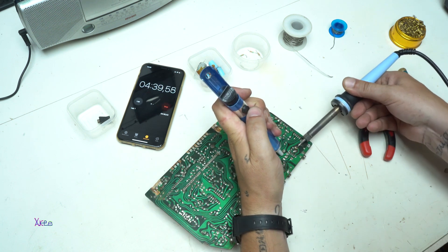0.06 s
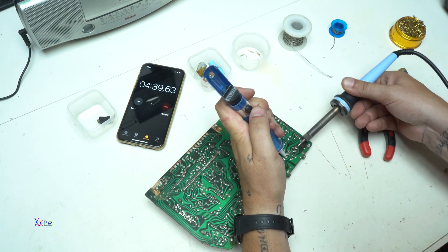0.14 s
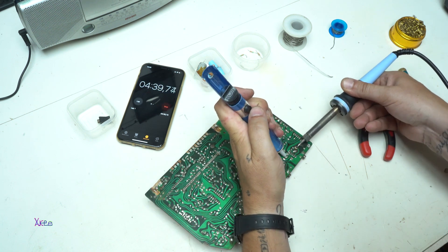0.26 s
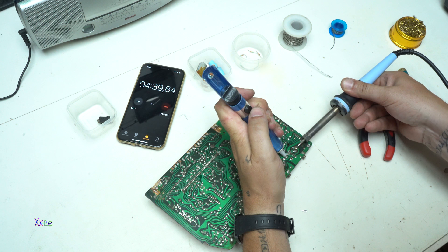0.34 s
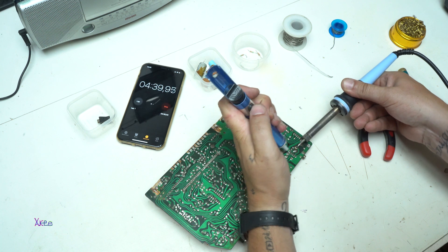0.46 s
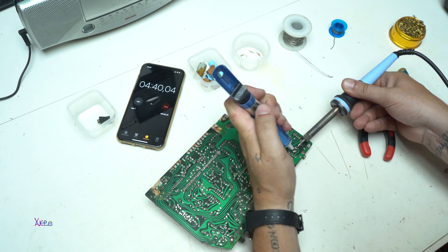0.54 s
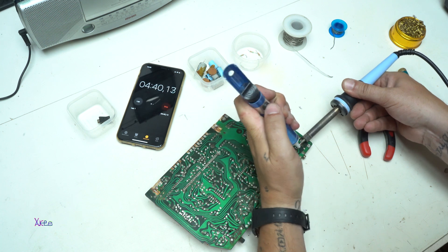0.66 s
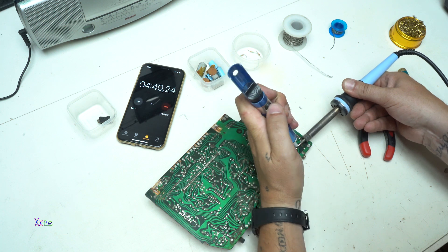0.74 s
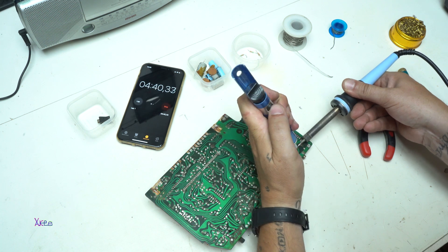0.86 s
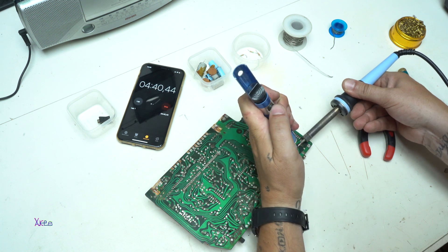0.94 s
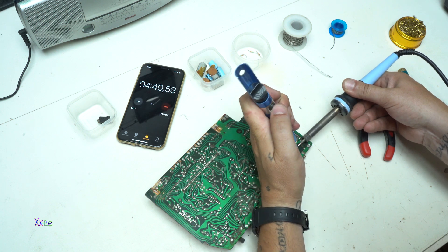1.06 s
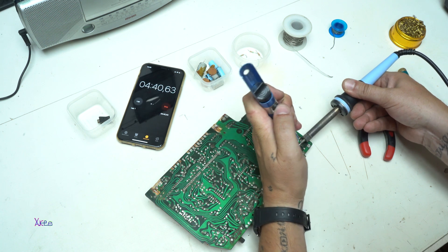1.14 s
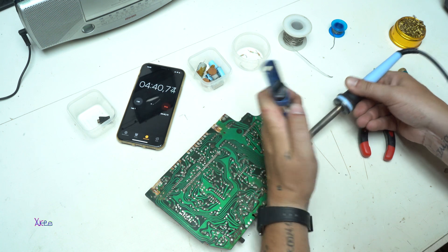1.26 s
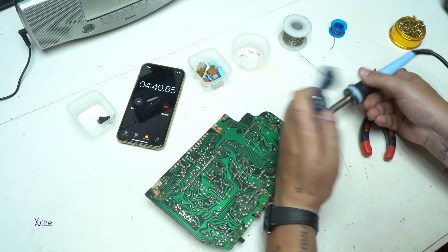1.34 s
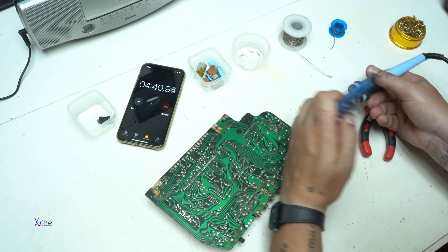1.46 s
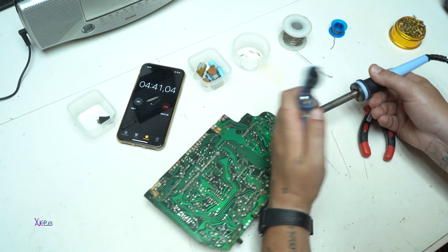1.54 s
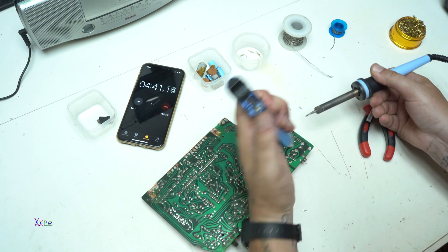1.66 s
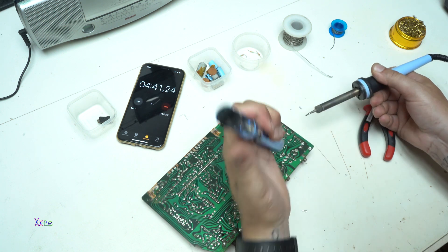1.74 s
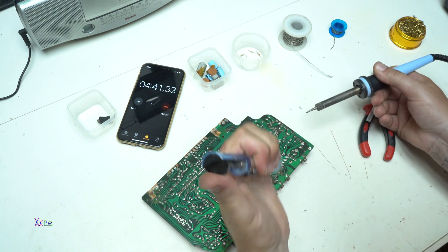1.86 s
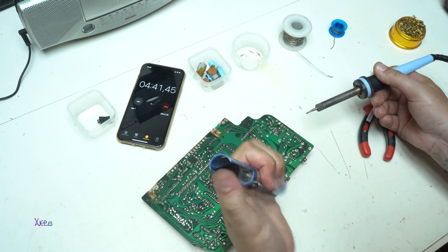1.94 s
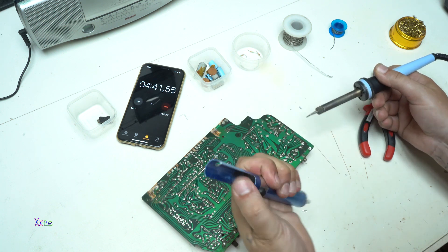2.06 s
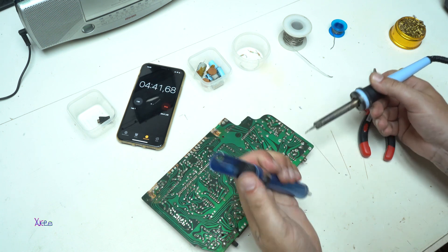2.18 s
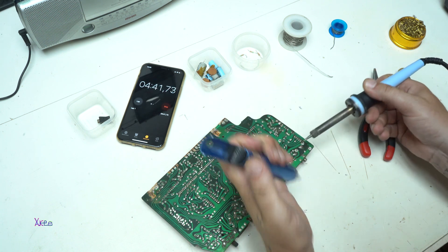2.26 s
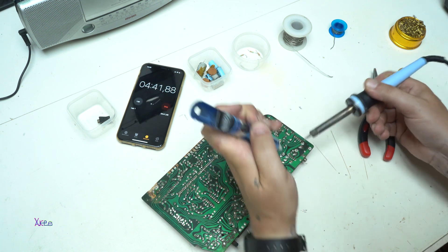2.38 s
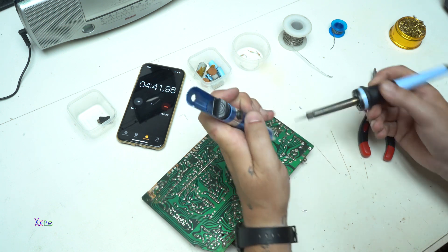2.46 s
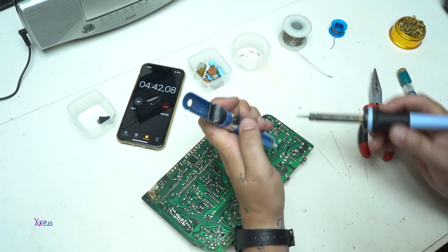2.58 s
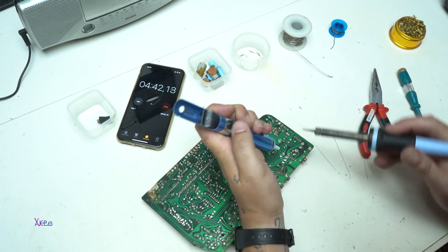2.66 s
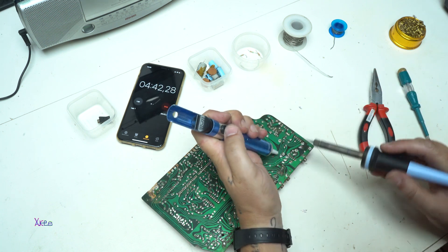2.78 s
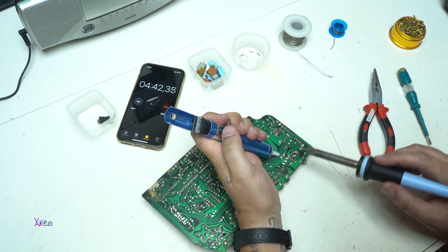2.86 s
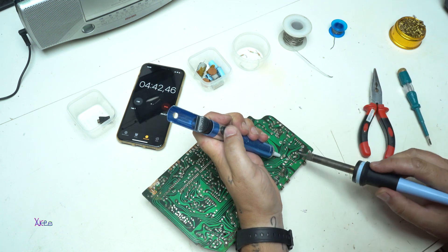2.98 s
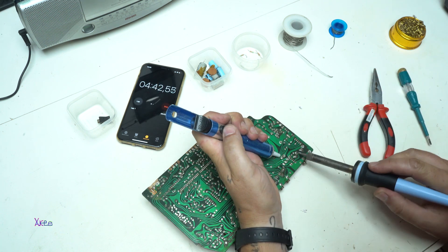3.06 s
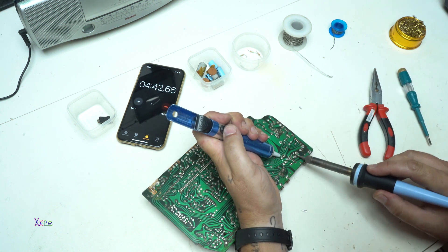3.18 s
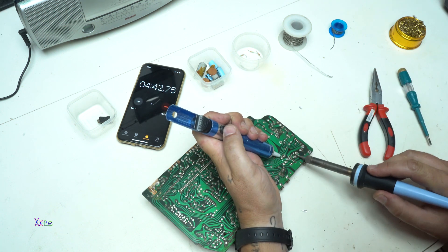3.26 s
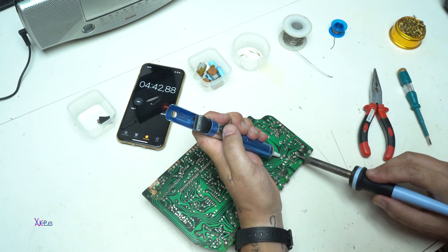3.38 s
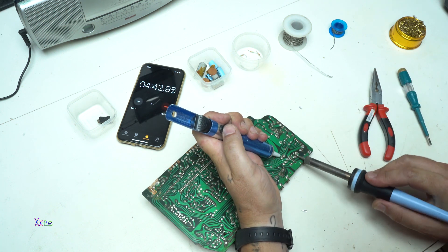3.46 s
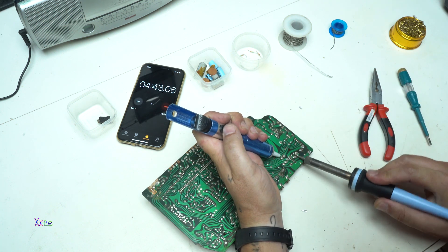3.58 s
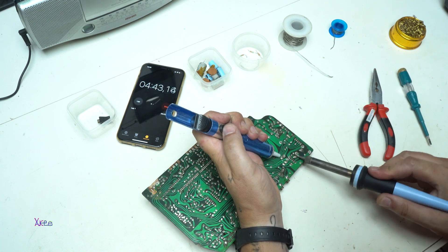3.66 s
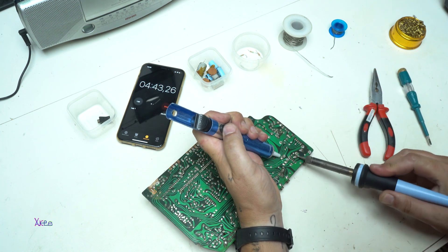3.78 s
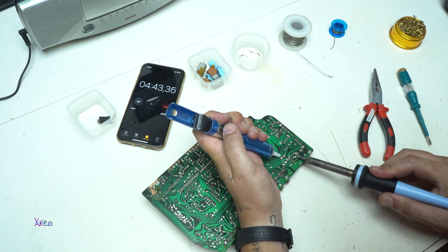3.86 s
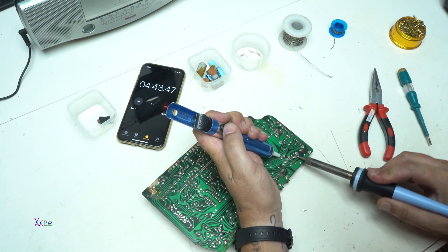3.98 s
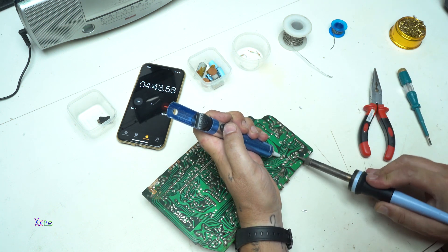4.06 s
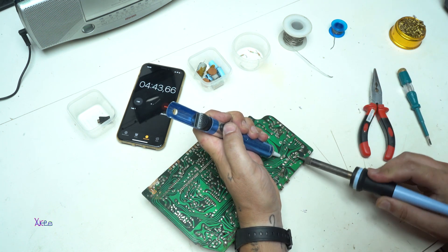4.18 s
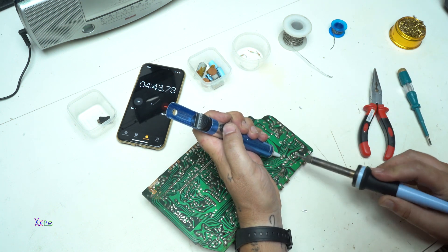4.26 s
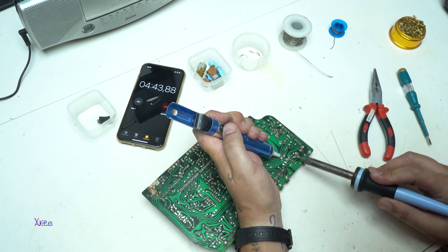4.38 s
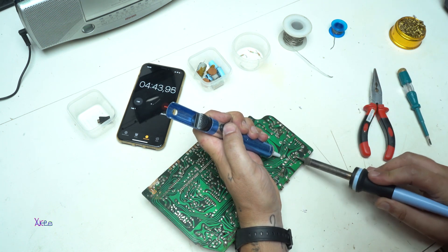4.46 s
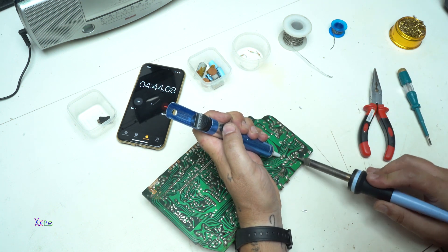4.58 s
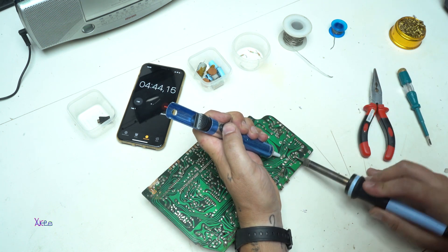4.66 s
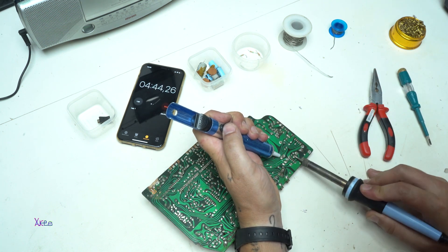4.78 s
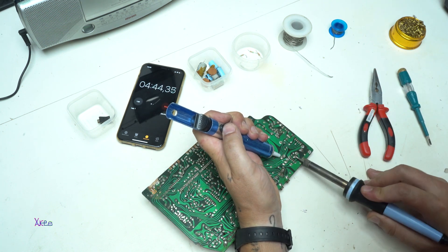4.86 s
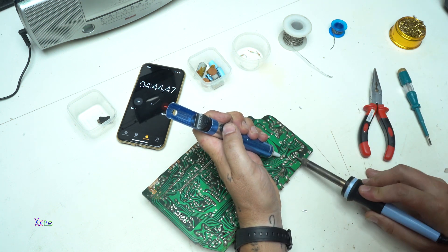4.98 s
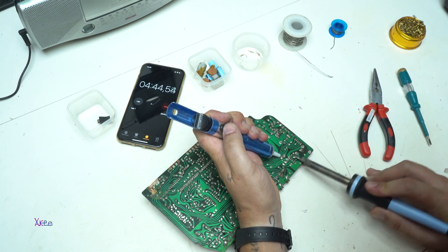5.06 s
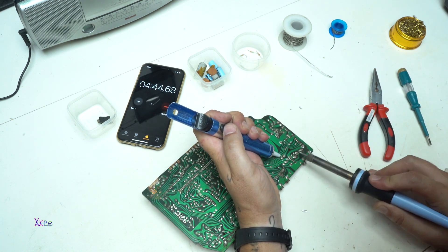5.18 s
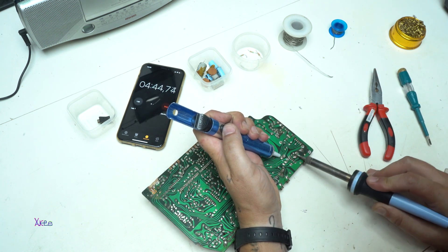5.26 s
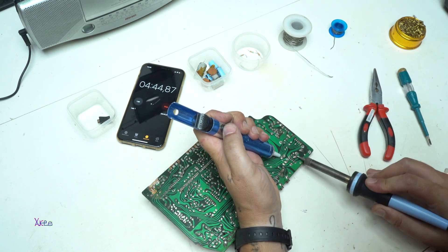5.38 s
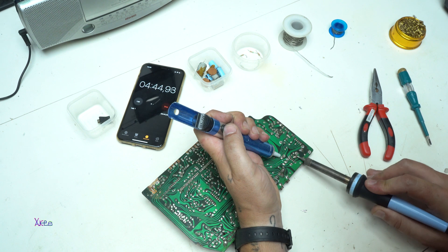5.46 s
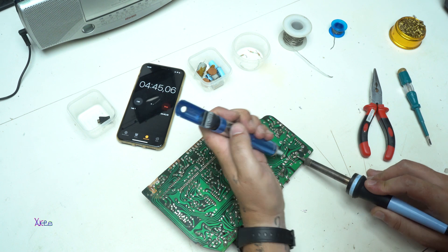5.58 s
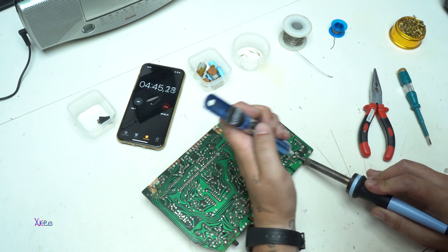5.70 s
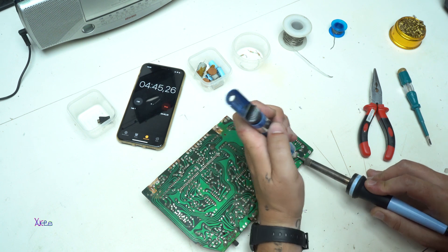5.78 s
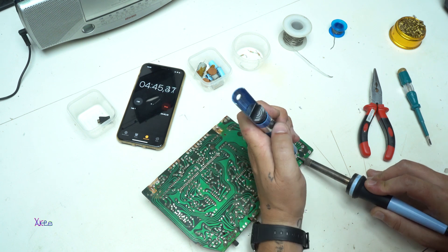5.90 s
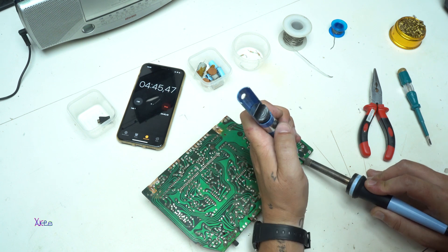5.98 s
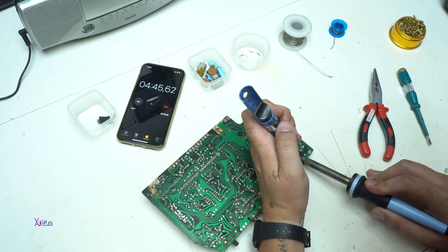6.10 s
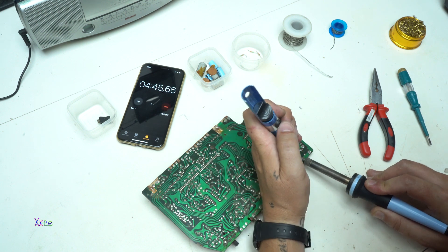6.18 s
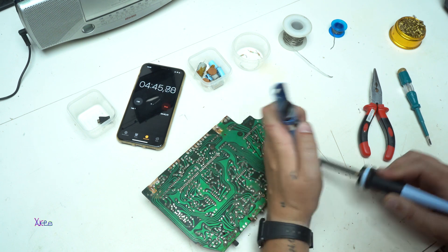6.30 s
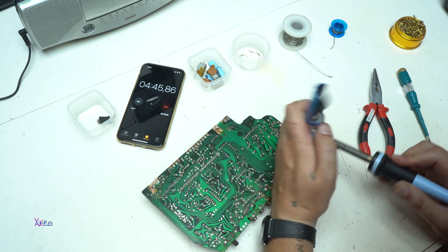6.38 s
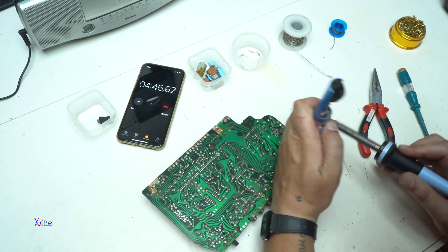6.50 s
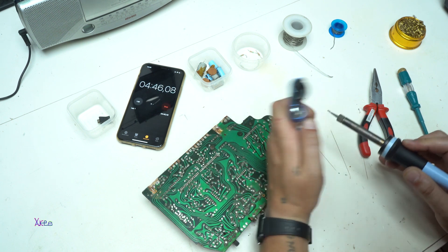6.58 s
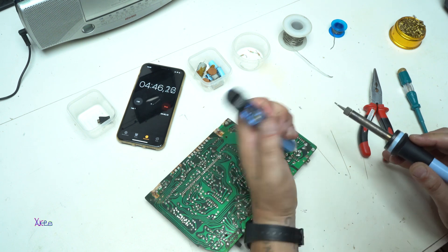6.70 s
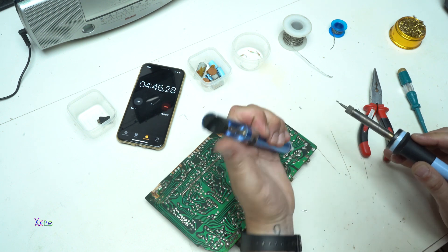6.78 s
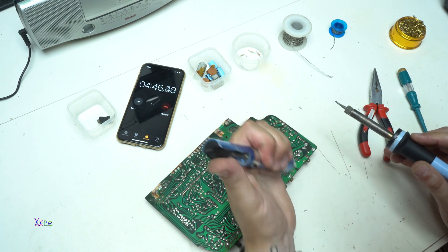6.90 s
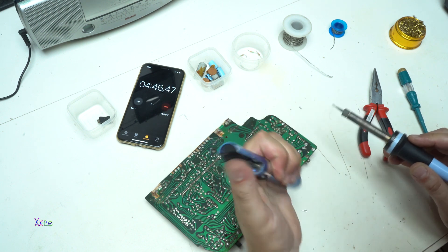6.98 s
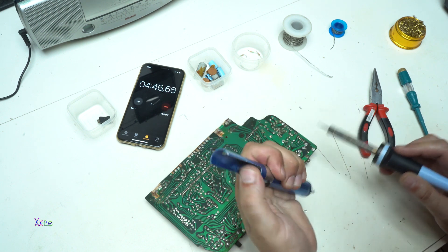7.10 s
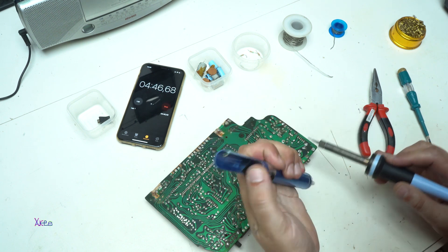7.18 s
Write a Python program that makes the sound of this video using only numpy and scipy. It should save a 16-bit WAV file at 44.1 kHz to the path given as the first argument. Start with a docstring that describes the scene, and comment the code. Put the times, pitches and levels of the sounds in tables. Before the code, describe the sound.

A steady, low hush fills a small, briefly echoing room, heard close to the bench. Faint gritty iron scrapes come at 0.1-0.5 s, with two dull bumps at 0.5. Around 1.35 a short nozzle squeak leads into a loud double-edged pump snap at 1.4, its spring ringing. Two hard woody knocks fall at 1.68 and 1.73, with weaker bounces by 1.83. The plunger slides from 2.0; a bright catch clicks at 2.13 and a lever clacks at 2.25. A hand brushes softly from 2.5, amid tiny pings and bumps. A firm tap lands at 3.2, a faint tick at 3.8, light taps at 4.3-4.6, a tiny squeak at 4.83, scrapes around 5 and a sharp tap at 5.37. After faint contacts, the pump snaps at 6.46, knocks at 6.73 and 6.78, and slides to a click at 7.18. The loudest peaks flatten slightly.

```python
"""At a bench in a small room, an iron scrapes and bumps a circuit board, a nozzle squeaks on it, and a desoldering
pump fires with a snap. The pump is knocked out on the bench and cocked again with a slide and clicks. A hand
slides on the bench, nozzle and iron tick, scrape and squeak, then the pump fires, knocks and clicks once more.
Blows are noise bursts and thumps that ring tuned modes, rubbing is grains on hiss, squeaks are gliding tones.
A steady hush lies under it all, the room echoes, and the loudest blows overload the microphone."""
import sys
import numpy as np
from scipy import signal
from scipy.fft import rfft, irfft
from scipy.io import wavfile
from scipy.ndimage import uniform_filter1d

SR = 44100
rng = np.random.default_rng(int(sys.argv[2]) if len(sys.argv) > 2 else 0)


def log_audio(samples):
    """Write samples as a 16-bit WAV file to the path given in sys.argv[1]."""
    # one column per channel
    frames = np.atleast_2d(samples).T
    # limit to full scale, then quantise
    limited = np.clip(frames, -1, 1)
    pcm = np.round(limited * 32767).astype(np.int16)
    wavfile.write(sys.argv[1], SR, pcm)


N = 319284  # samples, about 7.24 s


def amp(db):
    """Decibels to gain."""
    return 10 ** (np.asarray(db) / 20)


def unit(x):
    """Bring x to rms 1."""
    return x / np.sqrt(np.mean(x ** 2) + 1e-20)


def along(points, hz):
    """Read a curve of (Hz, value) points on a log frequency axis."""
    point_hz, value = np.transpose(points)
    return np.interp(np.log(hz + 1), np.log(point_hz + 1), value)


def add(track, s, sound):
    """Mix a sound into the track at time s, in place."""
    part = track[max(round(s * SR), 0):][:len(sound)]
    part += sound[:len(part)]


def coloured(x, colour, tilt=0, size=4096):
    """Minimum-phase filter with the given spectrum, tilted above 700 Hz in dB per octave."""
    hz = np.fft.rfftfreq(size, 1 / SR)
    spectrum_db = along(colour, hz) + tilt * np.log2(np.maximum(hz / 700, 1))
    cepstrum = irfft(np.log(amp(spectrum_db)))
    # folding the cepstrum onto positive time makes the filter causal
    fold = 1 + np.sign(size // 2 - np.arange(size))
    fold[0] = 1
    response = irfft(np.exp(rfft(cepstrum * fold)))[:size // 2]
    return signal.fftconvolve(x, response)[:len(x)]


def bouncing(rows, lag, loss_db):
    """Each contact is followed by a weaker one, lag s later."""
    return rows + [(s + lag, db - loss_db, tilt) for s, db, tilt in rows]


def blows(rows, colour, chatter, lead, t60, modes, ring_db):
    """The contact chatters as it closes, pushes home after lead s and settles in t60 s; the body's modes ring on."""
    track = np.zeros(N)
    t = np.arange(SR // 4) / SR
    after = np.maximum(t - lead, 0)
    closing = np.minimum(t / lead, 1) ** 2
    for s, db, tilt in rows:
        force = rng.standard_normal(len(t)) * closing * amp(-60 * after / t60)
        force *= chatter / np.linalg.norm(force)
        force -= uniform_filter1d(force, size=64, mode="constant")  # the chatter carries no bass
        add(force, lead, np.ones(1))  # the sharp part of the push
        add(force, lead, chatter * signal.windows.hann(64) / 32)  # its soft part gives the thump
        body = coloured(force, colour, tilt)
        body /= np.sqrt(np.sum(body ** 2) / (SR // 250))  # equal energy, as if rms 1 for 4 ms
        ring = np.zeros(len(t))
        for hz, level, life in modes:
            # every blow excites the modes a little differently
            fade = amp(level + rng.normal(0, 2) - 60 * after / life)
            ring += fade * np.sin(2 * np.pi * hz * rng.normal(1, .002) * after)
        add(track, s, amp(db) * (body + amp(ring_db) * ring))
    return track


def rubbing(rows, colour, rate, grain_db, attack, sag_db, release_t60, hiss=.5, judder_db=1.0):
    """Friction as tiny uneven slips, rate a second, on a fine hiss; each stroke rises, sags over its length and dies."""
    track = np.zeros(N)
    t = np.arange(SR // 2) / SR
    for s, length, db, tilt in rows:
        sign, size, judder, fine = rng.standard_normal((4, len(t)))
        slips = (rng.random(len(t)) < rate / SR) * sign * amp(grain_db * size)
        pressure = amp(judder_db * unit(uniform_filter1d(judder, size=300)))
        friction = unit(coloured(pressure * (unit(slips) + hiss * fine), colour, tilt))
        stroke = np.minimum(t / attack, 1) * amp(-sag_db * np.minimum(t / length, 1))
        release = amp(-60 * np.maximum(t - length, 0) / release_t60)
        add(track, s, amp(db) * stroke * release * friction)
    return track


# The pump fires. Each row: start in seconds, piston flight in seconds, release level in dB,
# flight level in dB, stop level in dB.
SHOTS = [(1.391, .0306, -1.5, -14, -9), (6.461, .027, -2.5, -19.5, -6.5)]
# Colour of the snap and the flight. Each row: frequency in Hz, level in dB.
SNAP_COLOUR = [(40, -26), (75, -7.5), (110, -3.5), (160, -16.5), (400, -14.5), (750, -16), (1800, -10),
               (3200, -8), (4800, -2), (5700, 0.5), (8000, -12), (11000, -8), (15500, -19.5)]
# Ringing of the pump's spring, also heard under its ticks. Each row: frequency in Hz, level in dB, t60 in seconds.
SPRING = [(3634, -12.5, .16), (4560, 5, 0.15), (4856, -2.5, .16), (5100, 0.5, 0.22), (7000, -9.5, .15),
          (10400, -10.5, .2)]
# The bench top under a shot or a knock. Each row: frequency in Hz, level in dB, t60 in seconds.
BENCH = [(104, -1, .42), (140, -5, .35), (210, -4, .22), (390, 3, .3), (597, 0, .24), (649, 1, .25),
         (709, 1.5, .24), (803, 0, .25), (1302, 6, .15), (1429, 7, .16), (1632, 4, .15), (1731, 3, .15),
         (1916, 3, .17)]
BENCH_BY_SHOT_DB = -15  # the recoil rings the bench top: offset on its mode levels


def firing(release_tilt=-1.3, stop_tilt=4):
    """The trigger lets go, the piston rattles up the barrel and hits its stop; the spring and the bench top ring."""
    releases = [(s, db, release_tilt) for s, _, db, _, _ in SHOTS]
    flights = [(s, flight, db, 0) for s, flight, _, db, _ in SHOTS]
    stops = [(s + flight, db, stop_tilt) for s, flight, _, _, db in SHOTS]
    contacts = bouncing(releases, lag=0.0043, loss_db=4) + stops
    modes = SPRING + [(hz, db + BENCH_BY_SHOT_DB, t60) for hz, db, t60 in BENCH]
    snaps = amp(-5.0) * blows(contacts, SNAP_COLOUR, chatter=5, lead=0.00099, t60=.017,
                              modes=modes, ring_db=-24.5)
    rattle = rubbing(flights, SNAP_COLOUR, rate=9900, grain_db=1.0, attack=0.0039, sag_db=2.5, release_t60=.015)
    return snaps + rattle


# The pump knocked on the bench. Each row: start in seconds, level in dB, brightness in dB per octave.
KNOCKS = [(1.6799, 6.5, -2.5), (1.731, 6, -1), (1.802, -4, -3), (1.8293, -9.5, -2), (6.729, 7, -3.5),
          (6.778, 4, -2.5), (6.837, -6.5, -1.5)]
# Colour of the knocks. Each row: frequency in Hz, level in dB.
KNOCK_COLOUR = [(40, -33), (110, -20), (300, -16), (700, -10), (1020, -11), (1380, .5), (1900, -5.5),
                (2400, -13), (3500, -14.5), (4900, -17), (7000, -28), (15500, -43)]
# the loose piston answers a knock: delay in s, level in dB, dB per dB of the knock, brightness in dB per octave
RATTLE_LAG_S, RATTLE_DB, RATTLE_GROWS, RATTLE_TILT = 0.0044, -19.5, 2.1, 6


def knocking():
    """Knocks boom in the bench top, and harder ones rattle the loose piston disproportionately more."""
    rattles = [(s + RATTLE_LAG_S, RATTLE_DB + RATTLE_GROWS * db, RATTLE_TILT) for s, db, _ in KNOCKS]
    return amp(-11.5) * blows(KNOCKS + rattles, KNOCK_COLOUR, chatter=6.3, lead=0.0032, t60=.017,
                              modes=BENCH, ring_db=-33.5)


# Pushes of the plunger. Each row: start in seconds, length in seconds, level in dB, brightness in dB per octave.
PLUNGER = [(2.003, 0.048, -38.5, 0), (2.066, 0.06, -38, -0.5), (6.95, 0.055, -46, -3.5),
           (7.067, 0.11, -38, -1.5)]
# Colour of the sliding plunger. Each row: frequency in Hz, level in dB.
PLUNGER_COLOUR = [(180, -37.5), (300, -13.5), (696, -16.5), (1490, -18.5), (1810, -20), (2210, -2.5),
                  (2740, -12), (3450, -1.5), (4420, -2.5), (5660, -3), (8840, -17.5), (11500, -13),
                  (15500, -26.5)]
# Clicks of the pump being cocked: lead ticks, the catch, and the clack of the returning lever.
# Each row: start in seconds, level in dB, brightness in dB per octave.
COCKING_CLICKS = [(2.1112, -11, -1), (2.1303, 18, 1), (2.248, -5, 1), (2.2535, 6.5, -2.5), (2.2587, 3, 7.5),
                  (7.1123, -11.5, -5), (7.1608, -13, -1), (7.1823, 16, 0)]
# Colour of these clicks. Each row: frequency in Hz, level in dB.
CLICK_COLOUR = [(50, -36.5), (250, -23), (800, -23), (1600, -19), (2300, -1.5), (2750, -8.5), (3250, 1.5),
                (4300, -5), (5200, -5), (7200, -10), (9000, -19.5), (11800, -16.5), (15500, -32)]
# Ringing of barrel and catch. Each row: frequency in Hz, level in dB, t60 in seconds.
BARREL = [(1870, -9.5, 0.14), (2223, -4.5, .22), (2390, -3, .26), (3080, -2.5, .32), (3160, -1, .25),
          (3295, -1.5, .17), (4000, -2.5, .3), (4210, -4.5, 0.17), (4720, -6, .22), (4830, -3, 0.22),
          (5585, -2.5, 0.19), (7000, -4.5, .3)]


def cocking():
    """The plunger slides down against the spring; lead ticks, catch and returning lever click and ring the barrel."""
    slide = rubbing(PLUNGER, PLUNGER_COLOUR, rate=5000, grain_db=2.0, attack=.016, sag_db=2.0, release_t60=.06)
    clicks = amp(-18.5) * blows(COCKING_CLICKS, CLICK_COLOUR, chatter=5, lead=0.0013, t60=0.021,
                                modes=BARREL, ring_db=-27)
    return slide + clicks


# Nozzle and iron strike the board. Each row: start in seconds, level in dB, brightness in dB per octave.
TAPS = [(3.203, -5.5, -1.5), (3.273, -27, -7), (4.322, -20, -1.5), (4.547, -14, 2.5), (4.571, -22, .5),
        (5.372, -2.5, 1.5), (6.11, -40, -6.5), (6.339, -34.5, -3)]
# Colour of the taps. Each row: frequency in Hz, level in dB.
TAP_COLOUR = [(50, -22.5), (130, -25), (250, -12), (400, -21.5), (600, -9.5), (850, -22), (1150, -2.5),
              (1350, 1), (1900, -11.5), (2300, -18), (3000, -11), (3900, -17), (5250, -2.5), (6200, -9.5),
              (7500, -11.5), (8800, -25), (15500, -37)]
# Ringing of the iron's steel shaft, also under its pings. Each row: frequency in Hz, level in dB, t60 in seconds.
IRON = [(5440, -2, 0.307), (5300, -2, .26), (5900, -10.5, .15), (6000, -9, 0.2), (10900, -9, 0.29)]
# The board's flexing, also under the bumps. Each row: frequency in Hz, level in dB, t60 in seconds.
PANEL = [(230, -10.5, 0.11), (262, 2.5, 0.21), (598, -5.5, 0.15), (1262, 5, .05), (1910, -5.5, .12)]


def taps():
    """Each strike rings both the iron's shaft and the flexing board."""
    return amp(-10.0) * blows(TAPS, TAP_COLOUR, chatter=1.33, lead=.0022, t60=0.023,
                              modes=IRON + PANEL, ring_db=-31.5)


# Dull bumps of the board. Each row: start in seconds, level in dB, brightness in dB per octave.
BUMPS = [(.497, -36.5, -2.5), (.52, -35.5, -1.5), (1.204, -47, 6), (1.337, -26.5, -2), (1.406, -3, 2.5),
         (1.412, -4, 4.5), (1.576, -27.5, -2.5), (2.462, -26.5, -32), (2.917, -23, -4.5), (2.988, -18.5, 1)]
# Colour of the bumps. Each row: frequency in Hz, level in dB.
BUMP_COLOUR = [(40, -20), (100, -16.5), (240, -9.5), (700, -3.5), (1000, -0.5), (1300, 3), (1800, -8),
               (2800, -20.5), (6000, -23.5), (15000, -42.5)]


def bumps():
    """A dull contact pushes the board, which rings in its flexing modes alone."""
    return amp(-7.5) * blows(BUMPS, BUMP_COLOUR, chatter=2.4, lead=.0014, t60=.035, modes=PANEL, ring_db=-23.0)


# Dry ticks of the pump's plastic trigger, nozzle and loose piston.
# Each row: start in seconds, level in dB, brightness in dB per octave.
TICKS = [(1.3455, -16.5, -3.5), (1.6442, -18.5, -5), (1.6545, -11, -5), (3.2045, -8.5, 3.5),
         (3.7712, -19, -2), (4.8364, -22.5, 4.5), (4.969, -17.5, 1.5), (5.019, -25.5, 6.5),
         (6.1625, -34.5, 1.5), (6.3785, -27.5, -1.5), (6.4268, -9.5, -2.5), (6.7115, -17, -5),
         (6.718, -6.5, -0.5), (6.983, -27, -5)]
# Colour of the ticks. Each row: frequency in Hz, level in dB.
TICK_COLOUR = [(100, -28.5), (1100, -24.5), (2300, -7), (3500, -6.5), (4800, 1), (6500, -3), (8200, -11),
               (10000, -17.5), (12500, -11.5), (15500, -22)]


def ticks():
    """Light, chattery contacts of the pump's parts leave only a faint ring in its spring."""
    return amp(-12) * blows(TICKS, TICK_COLOUR, chatter=5.4, lead=.00083, t60=0.028, modes=SPRING, ring_db=-38.0)


# The iron's tip ticks on solder joints. Each row: start in seconds, level in dB, brightness in dB per octave.
PINGS = [(2.6803, -34.5, -2), (2.7545, -28, -1), (2.7825, -25.5, -4), (2.8595, -24.5, -1.5),
         (4.3275, -21, 6.5), (4.427, -24.5, -2), (5.23, -41, 1)]
# Colour of the pings. Each row: frequency in Hz, level in dB.
PING_COLOUR = [(100, -37), (2500, -25), (4000, -13), (5000, 7.5), (6400, -1.5), (8300, -9), (10000, -18),
               (15500, -34)]


def pings():
    """The tip bounces once on each joint and the steel shaft rings faintly."""
    contacts = bouncing(PINGS, lag=.0075, loss_db=7)
    return amp(-12.0) * blows(contacts, PING_COLOUR, chatter=3.7, lead=0.00114, t60=0.017,
                              modes=IRON, ring_db=-40)


# The iron rubs on solder. Each row: start in seconds, length in seconds, level in dB, brightness in dB per octave.
SCRAPES = [(.118, 0.073, -44.5, -0.5), (.24, 0.026, -52.5, 4.5), (.45, .025, -51.5, 1),
           (1.328, 0.039, -44, -2.5), (2.875, 0.044, -42.5, 0.5), (4.305, 0.014, -44, 0),
           (4.93, 0.048, -42.5, 3), (5.03, 0.025, -43, 1), (5.112, 0.02, -45.5, 0), (5.565, .03, -53.5, 1),
           (5.635, .025, -55.5, 1), (6.105, 0.014, -46, -1), (6.338, 0.024, -42.5, -0.5),
           (6.64, 0.1, -49.5, 0.5)]
# Colour of the scrapes. Each row: frequency in Hz, level in dB.
SCRAPE_COLOUR = [(120, -7.5), (220, 1), (480, -4), (680, 1), (830, -8.5), (1150, 2.5), (1400, 0),
                 (1800, -1), (2500, -3), (3040, 1), (3480, -8.5), (4400, -12), (5330, -1), (6200, -11.5),
                 (6900, -8.5), (8300, -18), (13000, -20.5), (15500, -27.5)]


def scrapes():
    """Short strokes of the iron slip grain by grain over the solder."""
    return rubbing(SCRAPES, SCRAPE_COLOUR, rate=3200, grain_db=1, attack=0.0082, sag_db=2.0, release_t60=0.11)


# Squeaks of the pump's nozzle on the board and of the iron on solder. Each row: start in seconds,
# length in seconds, first pitch in Hz, last pitch in Hz, level in dB.
SQUEAKS = [(1.353, 0.031, 1385, 1470, -28.5), (1.371, 0.0077, 1496, 1370, -19),
           (4.833, 0.0152, 5630, 4940, -27.5), (4.846, 0.024, 1933, 1936, -46)]


def squeaks(overtone_db=-22, waver=.04):
    """Stick-slip as a wavering tone that swells and dies while its pitch glides; two overtones fall off evenly."""
    track = np.zeros(N)
    for s, length, first_hz, last_hz, db in SQUEAKS:
        progress = np.linspace(0, 1, round(length * SR))
        drift = unit(uniform_filter1d(rng.standard_normal(len(progress)), size=60))
        pitch_hz = (first_hz + (last_hz - first_hz) * progress) * (1 + waver * drift)
        phase = 2 * np.pi * np.cumsum(pitch_hz) / SR
        tone = sum(amp(db + k * overtone_db) * np.sin((k + 1) * phase) for k in range(3))
        add(track, s, np.sin(np.pi * progress) * tone)
    return track


# A hand slides on the bench. Each row: start in seconds, length in seconds, level in dB, brightness in dB per octave.
SLIDE = [(2.47, 0.31, -43, -0.5)]
# Colour of the sliding hand. Each row: frequency in Hz, level in dB.
SLIDE_COLOUR = [(100, -53), (220, -7), (450, -8), (700, -1.5), (1500, -0.5), (3000, -9), (6000, -16),
                (14000, -41.5)]


def hand():
    """Skin on the bench slips in dense fine grains, rising softly and fading slowly."""
    return rubbing(SLIDE, SLIDE_COLOUR, rate=15000, grain_db=-2.0, attack=0.079, sag_db=14, release_t60=0.62)


def board():
    """Iron and nozzle tap, bump, scrape and squeak on the board; pump parts tick and a hand shifts on the bench."""
    return taps() + bumps() + ticks() + pings() + scrapes() + hand() + squeaks()


# How long the room's tail lasts. Each row: frequency in Hz, t60 in seconds.
ROOM_T60 = [(100, 0.34), (260, .33), (700, 0.3), (1500, .22), (5000, 0.31), (13000, 0.15)]
# Colour of the tail, before bass trim and send level. Each row: frequency in Hz, level in dB.
ROOM_WET = [(50, -7), (120, 2), (350, 5.5), (1300, -4), (5000, -4), (13000, -1.5)]
# Early echoes off the walls, before the send level. Each row: delay in seconds, level in dB.
WALLS = [(.0075, -21.5), (0.0124, -13.5), (0.0145, -21), (.0235, -14), (.042, -28.5)]


def room(x, bass_db, build_up=0.0016):
    """A few wall echoes and a short diffuse tail of decaying noise; bass_db trims the tail's low end."""
    hz, t, noise = signal.stft(rng.standard_normal(SR // 2), SR, nperseg=256)
    fade = amp(-60 * t / along(ROOM_T60, hz)[:, None])
    wet_db = along(ROOM_WET, hz) + bass_db / (1 + (hz / 600) ** 2)
    # each band carries its own energy, however long it lasts
    fade *= amp(wet_db)[:, None] / np.sqrt(np.sum(fade ** 2, axis=1, keepdims=True) * t[1] * SR)
    tail = signal.istft(noise * fade, SR, nperseg=256)[1]
    tail *= 1 - np.exp(-(np.arange(len(tail)) / SR / build_up) ** 2)
    for delay, db in WALLS:
        add(tail, delay, amp([db]))
    return signal.fftconvolve(x, tail)[:N]


# Colour of the room's hush. Each row: frequency in Hz, level in dB.
HUSH = [(12, -33.5), (20, 3), (64, -17.5), (106, -0.5), (137, -8), (171, -11), (226, -10.5), (362, -13.5),
        (441, -12.5), (582, -12.5), (651, -15.5), (1310, -19), (1590, -20.5), (2160, -21.5), (15600, -30.5)]
HUSH_DB = -56  # rms level ahead of the microphone


def hushed_room():
    """Steady noise, strongest in the bass, lies under everything."""
    return amp(HUSH_DB) * unit(coloured(rng.standard_normal(N), HUSH))


def scene():
    """Each source excites the room with its own bass and send level, over a steady hush."""
    hush = hushed_room()
    shot, knocks, cocked, work = firing(), knocking(), cocking(), board()
    echoes = amp(-3.0) * room(shot, bass_db=8.0)
    echoes += amp(-1) * room(knocks, bass_db=-2.0)
    echoes += amp(-3.0) * room(cocked, bass_db=-10.0)
    echoes += amp(-2.5) * room(work, bass_db=2.75)
    return (shot + knocks + cocked + work + echoes + hush)[None]


TOP_HZ = 15750  # upper band limit


def record(dry, low_cut_hz=34, ceiling=0.91, hardness=6):
    """The microphone thins the deepest bass and flattens the highest peaks; a low-pass closes the top of the band."""
    high_pass = signal.butter(2, low_cut_hz, "highpass", fs=SR, output="sos")
    thin = signal.sosfilt(high_pass, dry)
    clipped = thin / (1 + np.abs(thin / ceiling) ** hardness) ** (1 / hardness)
    low_pass = signal.firwin(201, TOP_HZ, fs=SR)
    return signal.fftconvolve(clipped, low_pass[None], mode="same")


dry = scene()
out = record(dry)
log_audio(out)
```